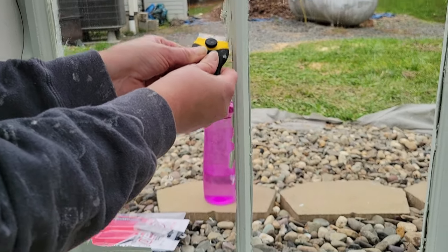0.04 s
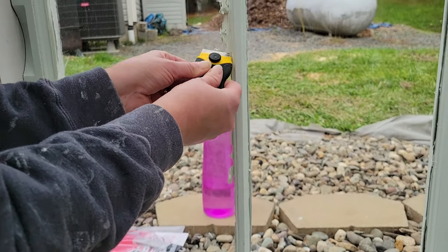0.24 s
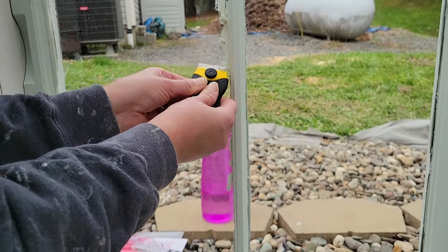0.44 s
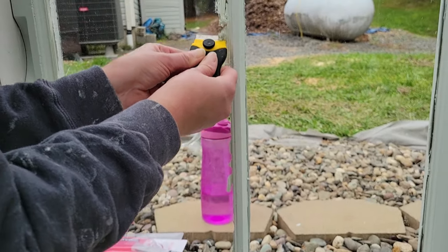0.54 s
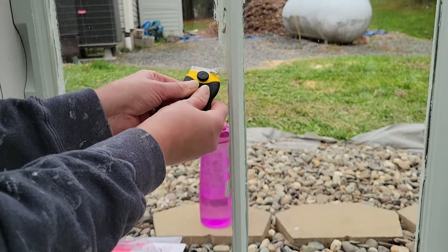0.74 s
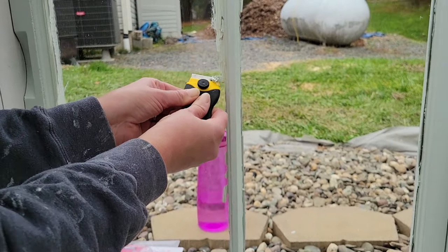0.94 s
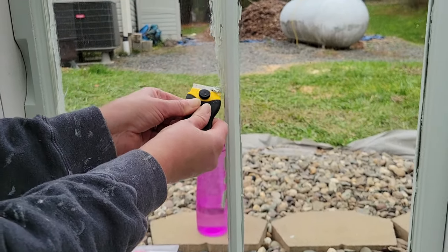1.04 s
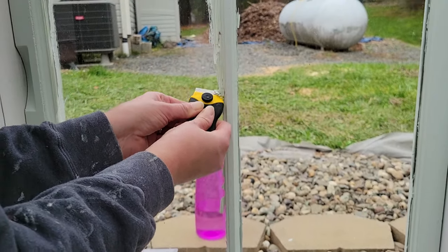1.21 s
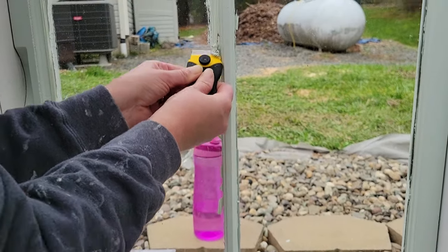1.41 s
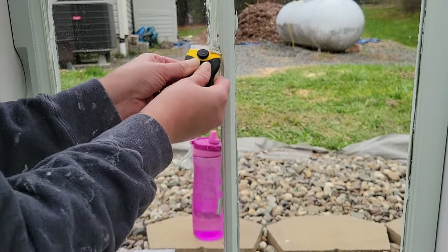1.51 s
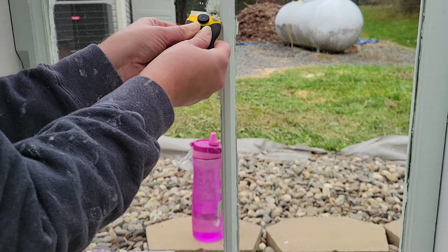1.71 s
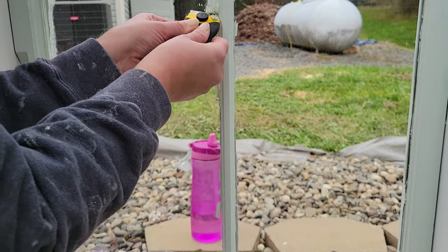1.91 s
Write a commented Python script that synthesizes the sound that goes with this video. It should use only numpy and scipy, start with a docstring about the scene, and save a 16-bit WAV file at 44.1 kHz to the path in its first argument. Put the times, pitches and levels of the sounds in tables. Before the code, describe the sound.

A razor scraper scrapes window glass in five short gritty strokes, with crackling paint, snaps and tiny squeaks; deep pane thumps overload the close microphone in a small room over faint outdoor rumble.

```python
"""A gritty rasp comes first, then a deep thump: a razor scraper is pushed in five short strokes along the edge
of a window pane, through dried paint and caulk. Dense random clicks make the tiny fractures, noise bursts the
snapping chips and gliding sines the brief squeaks; all of them ring the glass. Where the blade catches and slips,
the pane thumps on settling sines that overload a nearby microphone. A small room answers over a faint outdoor rumble."""
import sys
import numpy as np
from scipy import signal
from scipy.fft import rfft, irfft
from scipy.io import wavfile

SR = 44100
rng = np.random.default_rng(int(sys.argv[2]) if len(sys.argv) > 2 else 0)


def wrap_up_sound(samples):
    """Save the sound to the file named by the first command line argument, as 16-bit audio."""
    columns = np.atleast_2d(samples).T
    # keep every value between -1 and 1, then stretch to whole-number steps
    tamed = np.clip(columns, -1, 1)
    steps = np.round(tamed * 32767).astype(np.int16)
    wavfile.write(sys.argv[1], SR, steps)


N = 85995
T = np.arange(N) / SR  # seconds
FREQS = np.maximum(np.fft.rfftfreq(2 * N, 1 / SR), 1)  # Hz

# Blade contact, one table per stroke, before the band trims: time_s, rasp_db, grind_db, hiss_db
STROKE_LEVELS = [
    [(0, -40.5, -43, -57), (.026, -64, -47.5, -52.5), (.042, -54, -55, -64.5), (.085, -47, -56.5, -62.5),
     (.125, -63.5, -62.5, -73.5), (.165, -68.5, -71.5, -93), (.18, -53, -59.5, -94.5), (.22, -47, -54, -60),
     (.245, -38, -33, -70)],
    [(.475, -56, -55.5, -80), (.495, -44, -55.5, -65), (.51, -46, -47.5, -64), (.555, -37, -44.5, -60),
     (.564, -32, -36, -57), (.587, -36, -41, -60), (.606, -74, -74, -75), (.648, -63, -48, -66.5),
     (.7, -51.5, -63.5, -66), (.755, -56, -59, -65), (.785, -86, -75, -96)],
    [(1.18, -51.5, -55.5, -88), (1.2, -52.5, -52, -80), (1.214, -27, -47, -68), (1.228, -47, -60, -88),
     (1.255, -95, -68.5, -81), (1.305, -71, -66, -86)],
    [(1.336, -38, -31.5, -60), (1.343, -30, -29, -40.5), (1.364, -40, -21, -36.5), (1.371, -30, -24, -37.5),
     (1.386, -36, -25.5, -37.5), (1.4, -44, -32.5, -55), (1.424, -50, -37.5, -65.5)],
    [(1.516, -42.5, -41, -71), (1.535, -47, -52, -59), (1.539, -38, -33.5, -45.5),
     (1.567, -34, -31.5, -40.5), (1.585, -58, -33.5, -41), (1.591, -45, -23.5, -39),
     (1.601, -26.5, -26.5, -38.5), (1.613, -31, -18.5, -38), (1.633, -32, -25, -39),
     (1.648, -30.5, -27, -47), (1.672, -54, -48, -67)],
]
# Two tone bands of the pane under the blade, per stroke:
# low_hz, low_gain_db, high_hz, high_gain_db (negative dips)
STROKE_TONE_BANDS = [(740, 2.5, 3700, 3.5), (740, 3, 4230, 3), (740, 2.5, 5600, -3.5),
                     (804, 7.5, 4420, 3.5), (966, 4.5, 3300, 2)]
# Colour of the crumbling paint: frequency_hz, gain_db
PAINT_COLOUR = [(60, -13), (150, 5), (200, -3.5), (280, -14), (420, 3.5), (600, -4.5), (800, 3.5),
                (1050, -2.5), (2000, -0.5), (2900, -2), (3500, -8), (4200, -3.5), (5400, -6), (6300, -9),
                (7400, -14.5), (8600, -20.5), (10500, -26.5), (13000, -22.5), (15500, -25)]
# The blade catches and snaps free: start_s, level_db, length_s, upper_edge_hz
CHIP_SNAPS = [(0.2482, -22, 0.0021, 13000), (0.2485, -17.5, 0.0041, 380), (0.5591, -28.5, 0.0066, 9800),
              (0.921, -59.5, 0.0019, 5100), (1.2107, -28.5, 0.0054, 960), (1.3191, -33.5, .005, 4970),
              (1.4277, -20, 0.0084, 700)]
# The blade sticks and slips fast enough to squeak: start_s, level_db, starting_pitch_hz, length_s
BLADE_SQUEAKS = [(.558, -28, 790, 0.011), (0.554, -38.5, 4815, 0.015), (0.673, -54, 2990, 0.016),
                 (1.585, -32.5, 1020, 0.015), (1.6, -28, 1060, 0.0091), (1.606, -28, 3080, 0.016),
                 (1.615, -29.5, 1030, .013)]
# Ringing partials of the glass: pitch_hz, relative_level_db
GLASS_PARTIALS = [(425, -6.5), (730, -8.5), (778, -11.5), (967, -6), (1027, 3.5), (1538, -7), (1784, 15.5),
                  (2531, -12.5), (2935, -2.5), (3191, 6), (4077, -1.5), (4869, 9.5)]
# Colour of the room's answer: frequency_hz, gain_db
ROOM_COLOUR = [(100, 18), (400, 1.5), (1200, -2.5), (5200, -2), (7500, -3.5), (9500, -13), (16000, -4)]
# The pane flexes: start_s, level_db (before the swell), settled_pitch_hz, direction (1 in, -1 out)
PANE_THUMPS = [(0.2, -13, 60.5, 1), (0.246, 10, 62.7, -1), (.343, -12.5, 68.8, 1), (0.491, -25, 139, -1),
               (0.586, -19.5, 125, -1), (1.211, 4, 64.8, -1), (1.3206, 7, 55.4, -1), (1.4248, 7.5, 62, -1),
               (1.5195, -0.5, 61, -1), (1.612, -0.5, 64.5, -1), (1.627, 6, 58.6, 1)]
# Higher bending modes knocked with each thump: pitch_hz, level_db (relative to the thump), t60_s
BENDING_MODES = [(120.8, -19, 0.14), (197, -40.5, 0.081), (280, -35.5, 0.09), (368.4, -37, 0.052)]
# Trembling of the pane under the hands: time_s, level_db
TREMBLE_LEVEL = [(0, -34.5), (.17, -37.5), (.3, -23), (.45, -37.5), (.62, -35.5), (.85, -42), (1.15, -39.5),
                 (1.3, -28), (1.72, -29.5), (1.82, -45), (1.95, -45)]
# Colour of the trembling: frequency_hz, gain_db
TREMBLE_TONE = [(20, -40), (42, -6), (60, -0.5), (85, 0), (110, -10.5), (160, -26), (300, -58),
                (900, -70.5)]
# Colour of the distant background: frequency_hz, gain_db
BACKGROUND_COLOUR = [(100, 0), (220, -2.5), (400, 3), (800, -5), (1500, -8.5), (3000, -13), (6000, -17.5),
                     (10000, -32), (12500, -23.5), (16000, -31)]

# Scraping
RASP_DB, GRIND_DB, HISS_DB = 2.5, -0.5, 1
RASP_TOP_HZ, GRIND_TOP_HZ = 1200, 8400
ATTACK_S, RELEASE_S = 0.0085, 0.013
CRACKS_PER_S, CRACK_SPREAD_DB = 3500, 6
JUDDER_POINTS_PER_S, JUDDER_DB = 200, 2.5
TONE_BAND_OCTAVES = 0.24
# Snaps and squeaks
SNAP_FALL_S = 0.0012
SQUEAK_SAG_OCTAVES_PER_S = 5.8
SQUEAK_WOBBLE, WOBBLE_POINTS_PER_S = 0.0243, 600  # wobble as a fraction of the pitch
SUDDEN_RING_DB, SUDDEN_LAG_S = -2, 0.00026  # their send into the window; their delay between the ports
# Window and room
DIRECT_DB, GLASS_DB, SASH_DB, ROOM_DB = -11.5, -14, -1, -7.5
GLASS_T60_S, SASH_T60_S, ROOM_T60_S = 0.17, 0.04, 0.32
SHIFTS_PER_S = 6  # how fast the sash's response changes as the blade travels
PAN_DB = -1.5  # left port against right
# Flexing
THUMP_RISE_S, THUMP_FALL_S = 0.0072, 0.017
STIFFEN_HZ, STIFFEN_S = 39.7, 0.01068  # how sharp a thump starts, and how quickly it settles
# Background and microphone
BACKGROUND_DB = -62.5
PORT_LAG_S, THUMP_LAG_S, ALIKE_BELOW_HZ = 0.000319, 0.00052, 530
CLIP_LEVEL, CLIP_HARDNESS = 0.42, 21.3
TOP_HZ = 15900


def scraping():
    """Each stroke crumbles paint: a low rasp, a grind, and hiss where the edge skates on bare glass."""
    low, mid = below(RASP_TOP_HZ), below(GRIND_TOP_HZ)
    bands = [low, mid * np.sqrt(1 - low ** 2), np.sqrt(1 - mid ** 2)]
    trims = (RASP_DB, GRIND_DB, HISS_DB)
    grit = cracks()
    out = 0
    for stroke, (low_hz, low_db, high_hz, high_db) in zip(STROKE_LEVELS, STROKE_TONE_BANDS):
        times, *levels = np.array(stroke).T
        early = np.maximum(times[0] - T, 0)
        late = np.maximum(T - times[-1], 0)
        contact = np.exp(-early / ATTACK_S - late / RELEASE_S)
        tilt_db = low_db * tone_band(low_hz) + high_db * tone_band(high_hz)
        tone = colour(PAINT_COLOUR) * undb(tilt_db)
        for band, level, trim in zip(bands, levels, trims):
            gain = undb(np.interp(T, times, level) + trim)
            out = out + contact * gain * unit(shape(grit, tone * band))
    return out


def cracks():
    """Dense tiny fractures of either sign, made louder and softer by the judder of the blade."""
    hits = rng.random(N) < CRACKS_PER_S / SR
    signs = rng.choice([-1, 1], N)
    sizes = undb(CRACK_SPREAD_DB * np.clip(rng.standard_normal(N), -2, 2))
    judder = wander(JUDDER_POINTS_PER_S)
    return unit(hits * signs * sizes * undb(JUDDER_DB * judder))


def tone_band(hz):
    """A tone band of the pane as a bell curve on the octave scale, 1 at its centre."""
    return np.exp(-(np.log2(FREQS / hz) / TONE_BAND_OCTAVES) ** 2)


def snaps():
    """A chip gives way in a burst of noise that starts at once, holds for milliseconds and dies."""
    noise = rng.standard_normal(N)
    out = 0
    for start, db, length, top_hz in CHIP_SNAPS:
        grit = unit(shape(noise, colour(PAINT_COLOUR) * below(top_hz, order=2)))
        fall = np.exp(-np.maximum(T - start - length, 0) / SNAP_FALL_S)
        out = out + undb(db) * grit * (T >= start) * fall
    return out


def squeaks():
    """Brief stick-slip tones that swell, waver and sag as the blade slows."""
    wobble = wander(WOBBLE_POINTS_PER_S)
    out = 0
    for start, db, hz, length in BLADE_SQUEAKS:
        age = np.clip(T - start, 0, length)
        sag = 2 ** (-SQUEAK_SAG_OCTAVES_PER_S * age)
        pitch = hz * sag * (1 + SQUEAK_WOBBLE * wobble)
        swell = np.sin(np.pi * age / length)
        tone = np.sqrt(2) * np.sin(2 * np.pi * np.cumsum(pitch) / SR)
        out = out + undb(db) * swell * tone
    return out


def flexing():
    """The pane's lowest mode swells after each slip, starts sharp and settles; throughout, the pane trembles."""
    tremble = unit(shape(rng.standard_normal(N), colour(TREMBLE_TONE)))
    out = undb(np.interp(T, *np.array(TREMBLE_LEVEL).T)) * tremble
    for start, db, hz, direction in PANE_THUMPS:
        age = np.maximum(T - start, 0)
        turns = hz * age + STIFFEN_HZ * STIFFEN_S * (1 - np.exp(-age / STIFFEN_S))
        swell = (1 - np.exp(-age / THUMP_RISE_S)) ** 2 * np.exp(-age / THUMP_FALL_S)
        thump = swell * np.sin(2 * np.pi * turns)
        for mode_hz, mode_db, t60 in BENDING_MODES:
            thump = thump + undb(mode_db) * fade(t60, age) * np.sin(2 * np.pi * mode_hz * age)
        out = out + np.sign(direction) * undb(db) * thump
    return two_ports(out, THUMP_LAG_S)


def window(drive, count=3):
    """Blade noise arrives directly, through ringing glass, by shifting paths in the sash, and from the room."""
    out = undb(DIRECT_DB) * two_ports(drive)
    out = out + through(drive, two_ports(glass_ring()), GLASS_DB)
    out = out + through(drive, room_tail(), ROOM_DB)
    # overlapping shares of the drive rotate among the sash paths as the blade travels
    for k in range(count):
        share = np.sqrt(2 / count) * np.cos(np.pi * (SHIFTS_PER_S * T + k / count))
        out = out + through(drive * share, diffuse() * fade(SASH_T60_S), SASH_DB)
    return out * undb(np.array([[PAN_DB], [-PAN_DB]]) / 2)


def glass_ring():
    """The glass rings as a cluster of sine partials dying together."""
    partials = [undb(db) * np.sin(2 * np.pi * (hz * T + rng.random())) for hz, db in GLASS_PARTIALS]
    return sum(partials) * fade(GLASS_T60_S)


def room_tail():
    """The small room answers as coloured stereo noise dying away."""
    return shape(diffuse(), colour(ROOM_COLOUR)) * fade(ROOM_T60_S)


def background():
    """A faint outdoor rumble: steady coloured stereo noise."""
    return undb(BACKGROUND_DB) * unit(shape(diffuse(), colour(BACKGROUND_COLOUR)))


def through(x, ring, db):
    """Convolve with a decaying response scaled to unit energy, at a level in dB."""
    return undb(db) * shape(x, rfft(unit(ring) / np.sqrt(N), 2 * N))


def diffuse():
    """Stereo noise, alike at both ports in the bass only."""
    alike = below(ALIKE_BELOW_HZ, order=1)
    shared = shape(two_ports(rng.standard_normal(N)), alike)
    separate = shape(rng.standard_normal((2, N)), np.sqrt(1 - alike ** 2))
    return shared + separate


def two_ports(x, lag=PORT_LAG_S):
    """Sound from the pane reaches the left microphone port first, the right one a lag later."""
    return np.array([x, shape(x, np.exp(-2j * np.pi * FREQS * lag))])


def wander(points_per_s):
    """Random values joined by straight lines."""
    return np.interp(T * points_per_s, np.arange(N), rng.standard_normal(N))


def fade(t60, age=T):
    """Exponential decay, 60 dB down after t60 seconds."""
    return np.exp(-np.log(1000) * age / t60)


def undb(db):
    """Decibels to gain."""
    return 10 ** (np.asarray(db) / 20)


def unit(x):
    """Scale to rms 1."""
    return x / np.sqrt(np.mean(x ** 2))


def shape(x, gain):
    """Filter by a gain for each frequency."""
    return irfft(rfft(x, 2 * N) * gain)[..., :N]


def colour(points):
    """Gain for each frequency from (Hz, dB) points, joined on a log-frequency scale."""
    hz, db = np.array(points).T
    return undb(np.interp(np.log(FREQS), np.log(hz), db))


def below(hz, order=6):
    """Low-pass gain."""
    return 1 / np.sqrt(1 + (FREQS / hz) ** (2 * order))


def scene():
    """Scraper, pane and background; snaps and squeaks radiate from the blade and also ring the window."""
    sudden = snaps() + squeaks()
    blade = two_ports(sudden, SUDDEN_LAG_S)
    ringing = window(scraping() + undb(SUDDEN_RING_DB) * sudden)
    return blade + ringing + flexing() + background()


def record(dry):
    """The microphone flattens the tops of the thumps; the top of the treble is cut."""
    # 5.5 sets the gain of quiet sound slightly below 1; loud sound levels off at CLIP_LEVEL
    drive = abs(dry / CLIP_LEVEL) ** CLIP_HARDNESS
    clipped = dry / (5.5 + drive) ** (1 / CLIP_HARDNESS)
    treble_cut = signal.ellip(10, 0.2, 80, TOP_HZ, fs=SR, output="sos")
    return signal.sosfilt(treble_cut, clipped)


dry = scene()
out = record(dry)
wrap_up_sound(out)
```